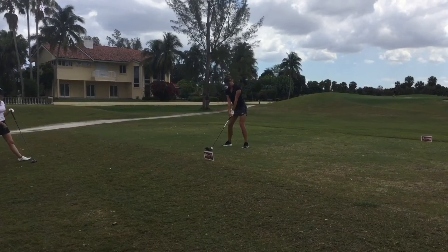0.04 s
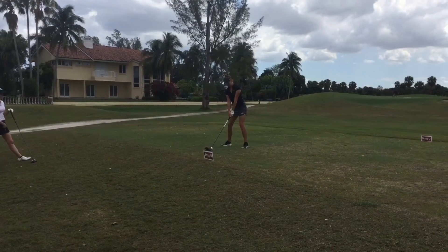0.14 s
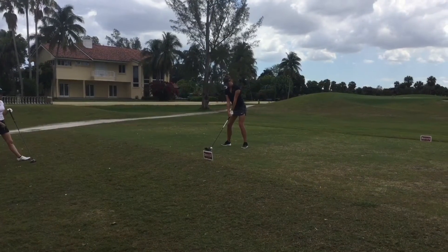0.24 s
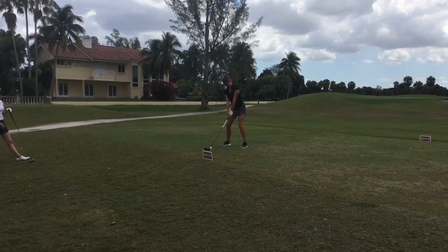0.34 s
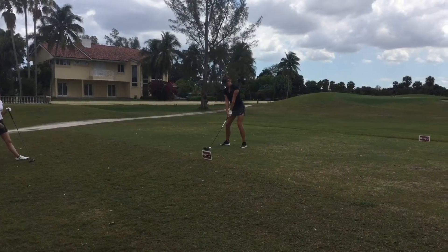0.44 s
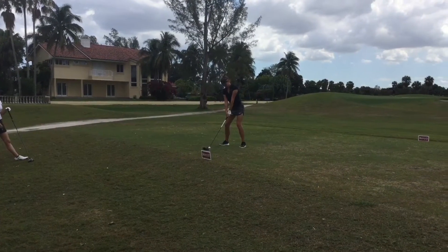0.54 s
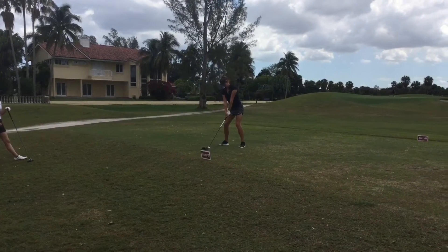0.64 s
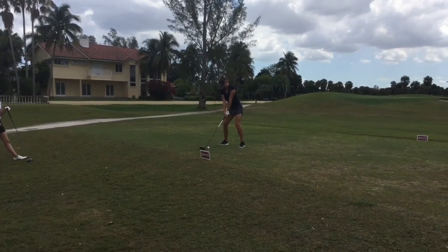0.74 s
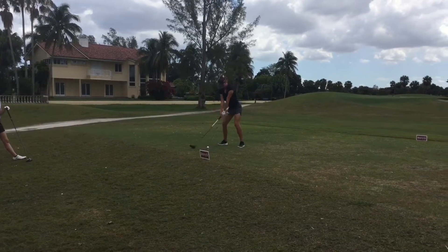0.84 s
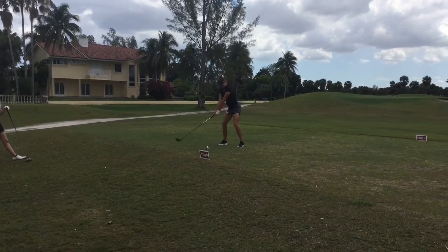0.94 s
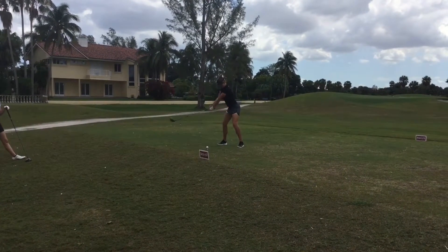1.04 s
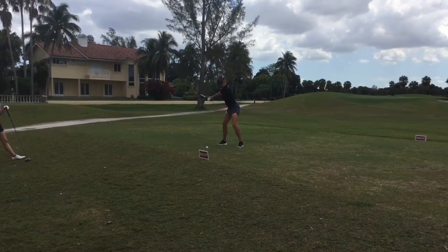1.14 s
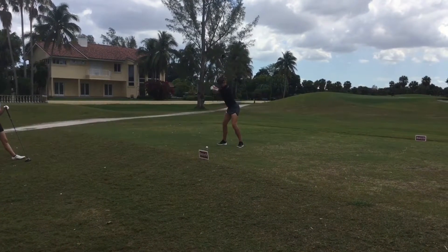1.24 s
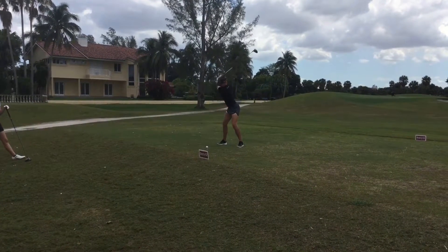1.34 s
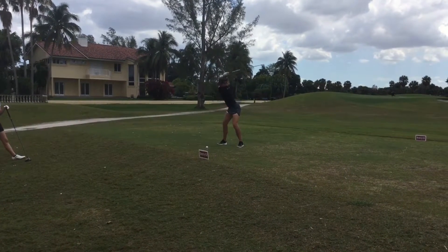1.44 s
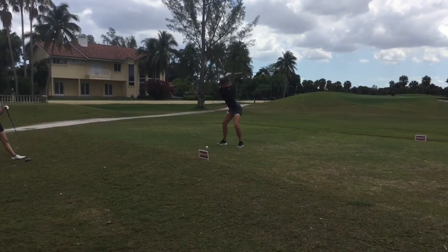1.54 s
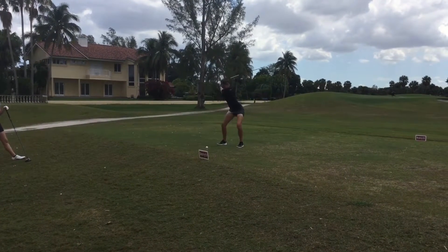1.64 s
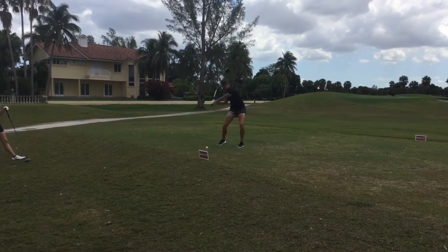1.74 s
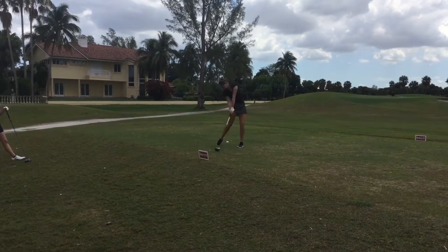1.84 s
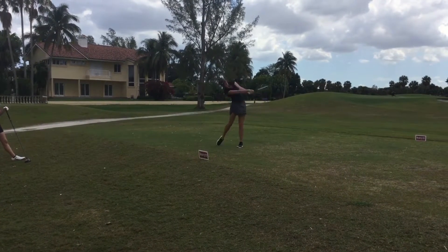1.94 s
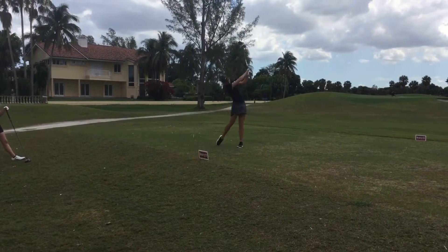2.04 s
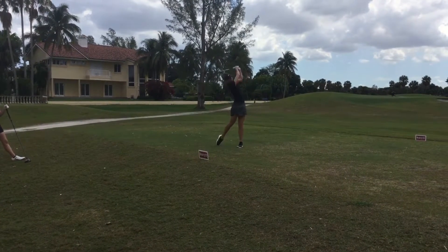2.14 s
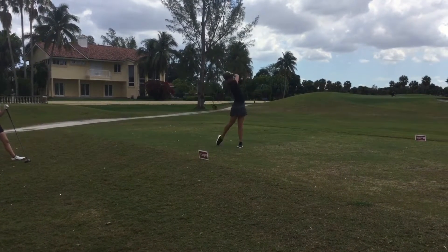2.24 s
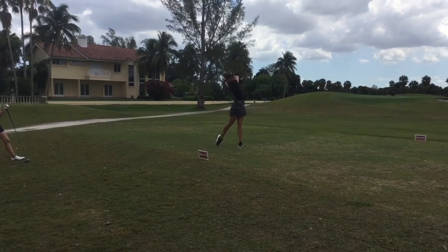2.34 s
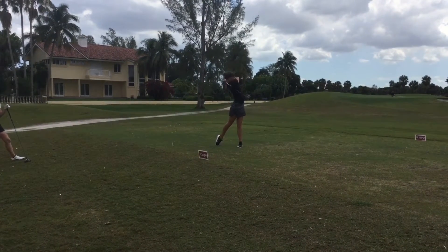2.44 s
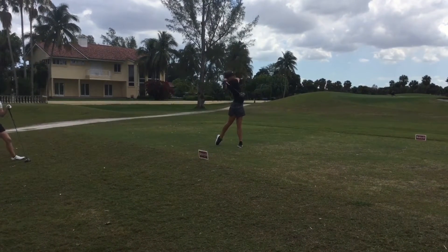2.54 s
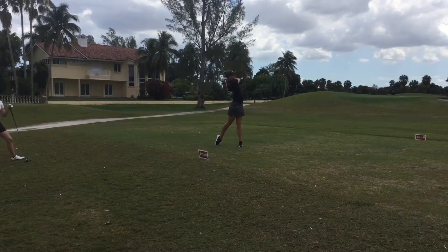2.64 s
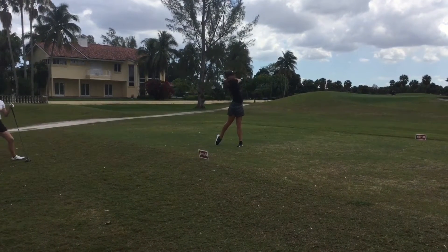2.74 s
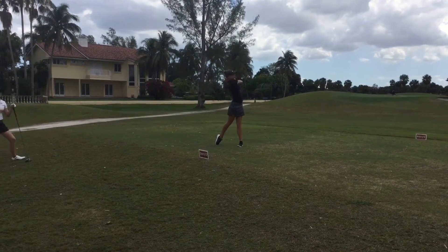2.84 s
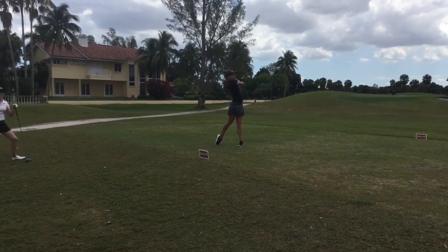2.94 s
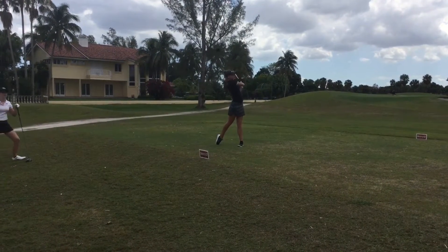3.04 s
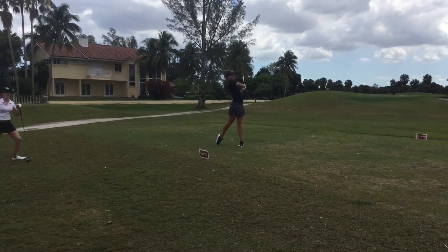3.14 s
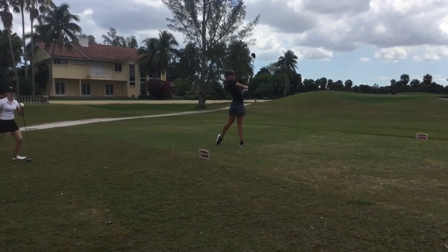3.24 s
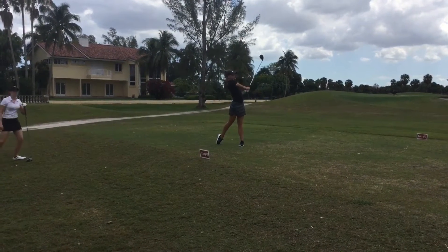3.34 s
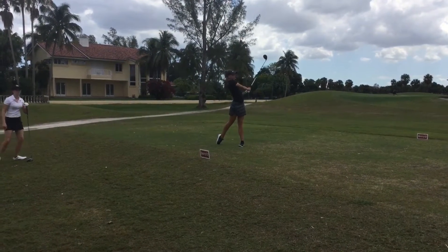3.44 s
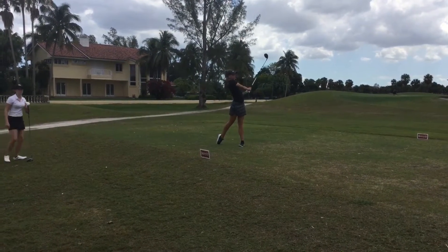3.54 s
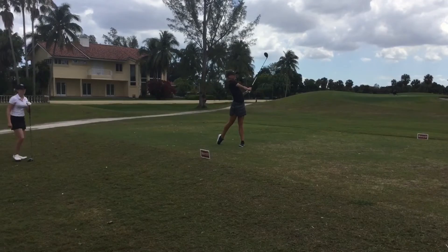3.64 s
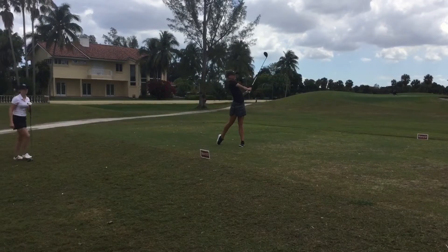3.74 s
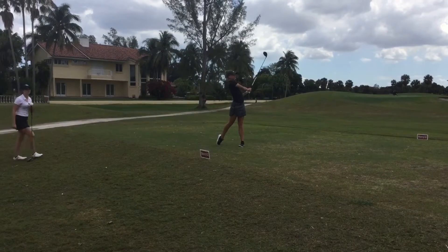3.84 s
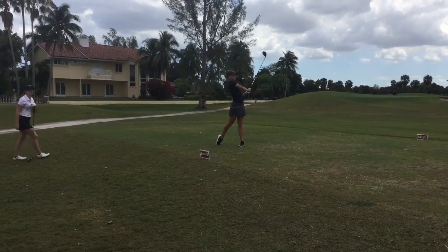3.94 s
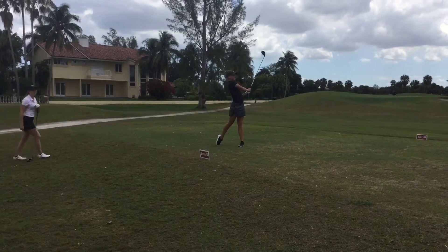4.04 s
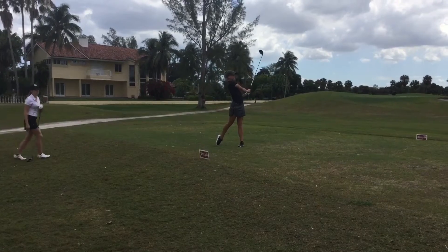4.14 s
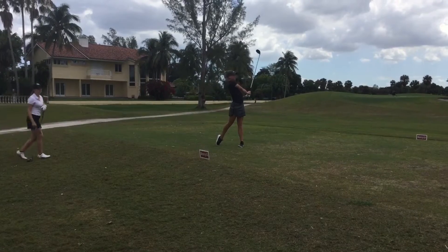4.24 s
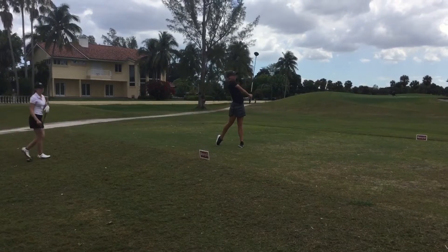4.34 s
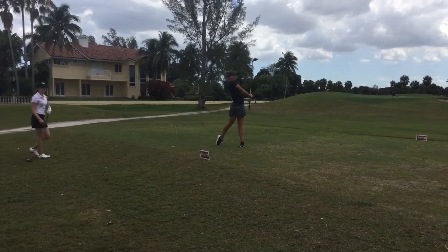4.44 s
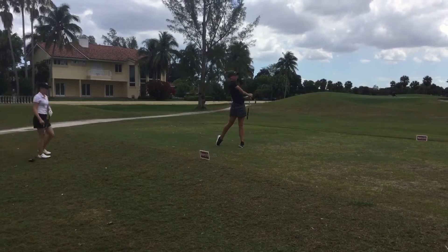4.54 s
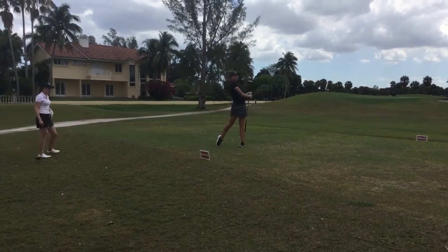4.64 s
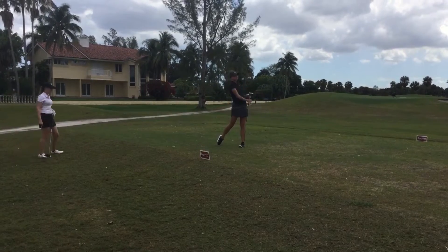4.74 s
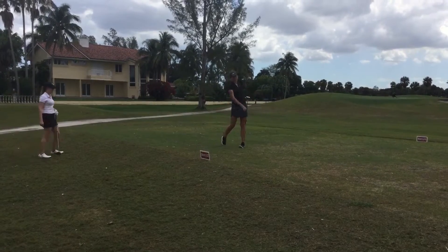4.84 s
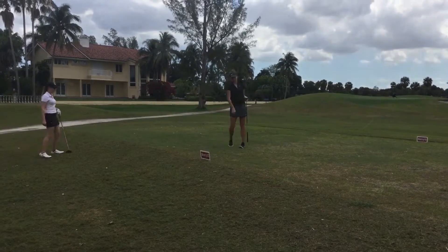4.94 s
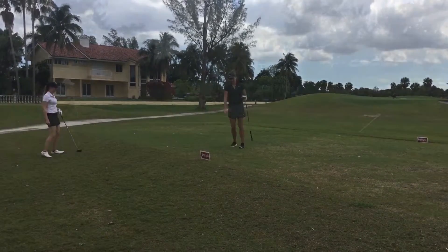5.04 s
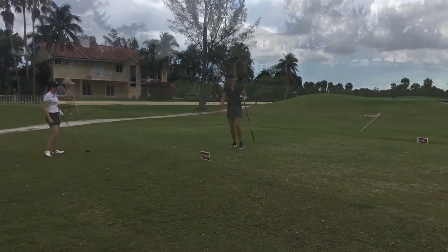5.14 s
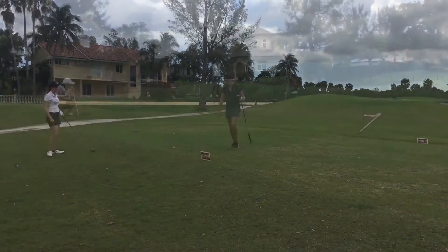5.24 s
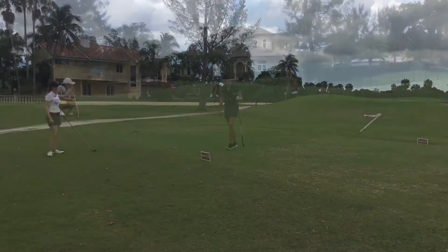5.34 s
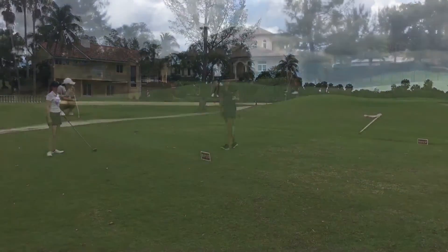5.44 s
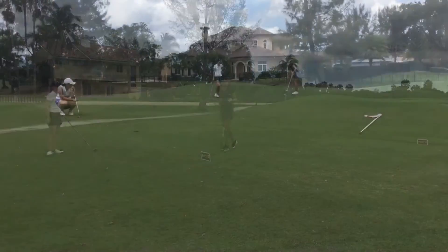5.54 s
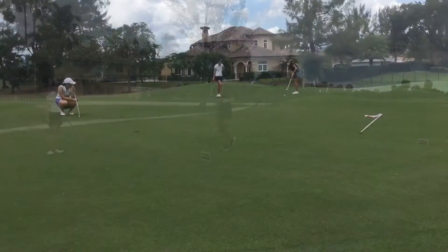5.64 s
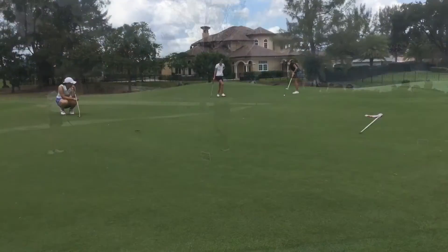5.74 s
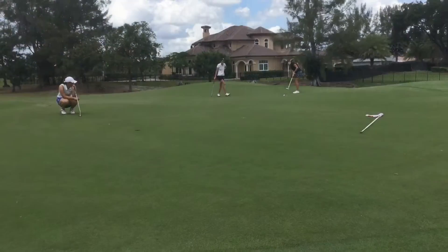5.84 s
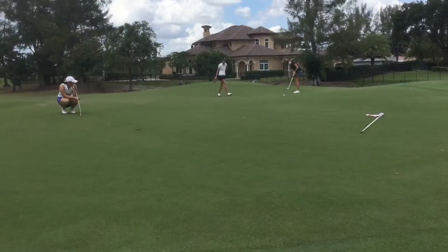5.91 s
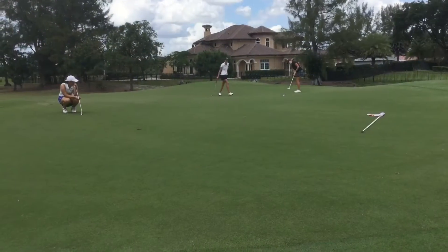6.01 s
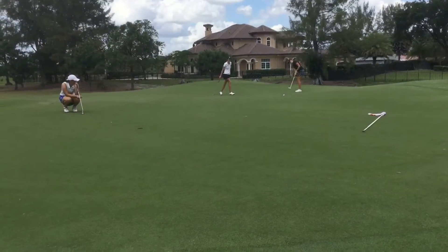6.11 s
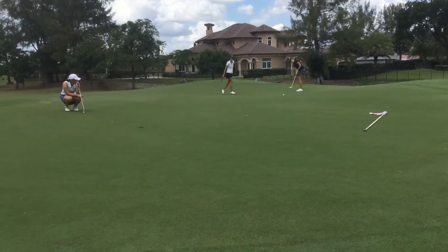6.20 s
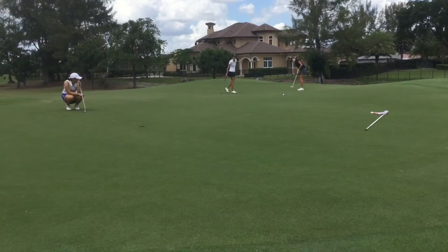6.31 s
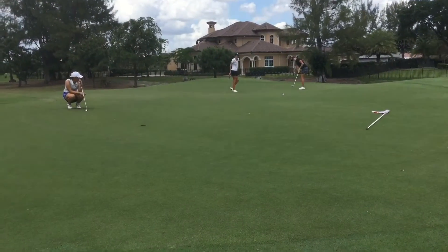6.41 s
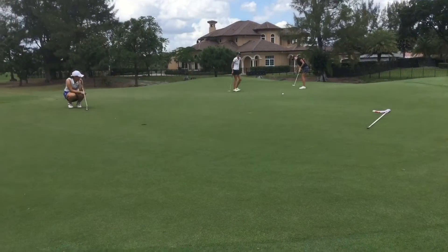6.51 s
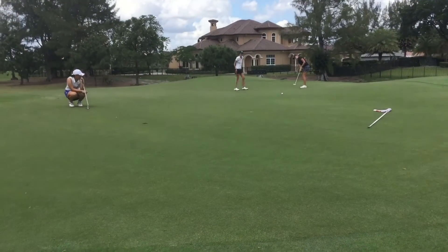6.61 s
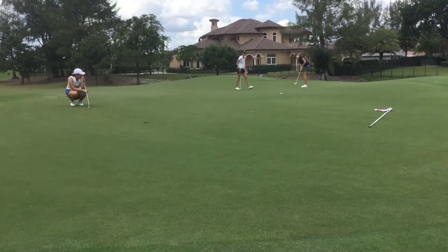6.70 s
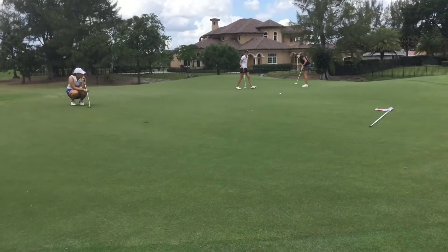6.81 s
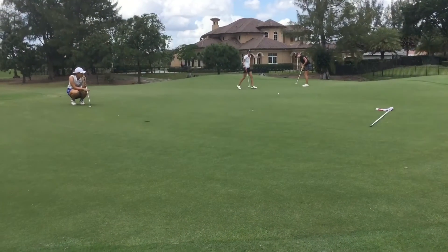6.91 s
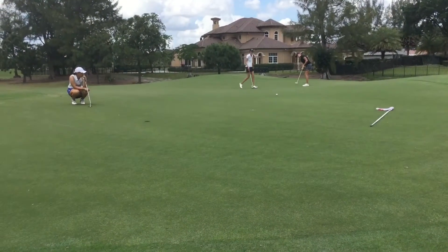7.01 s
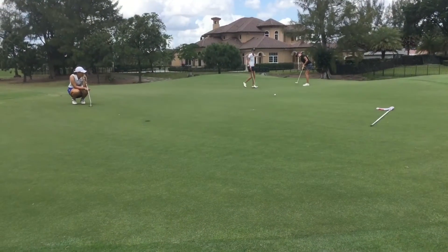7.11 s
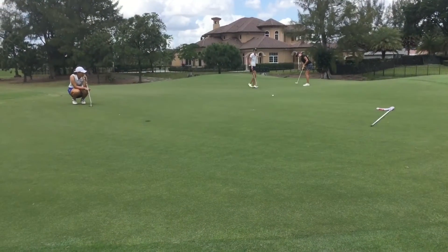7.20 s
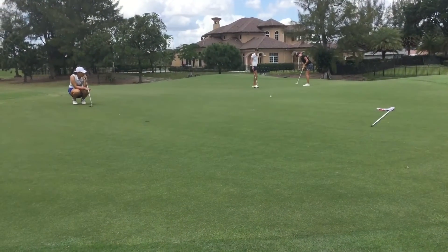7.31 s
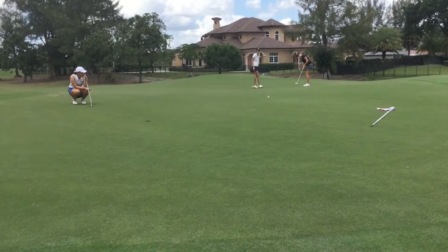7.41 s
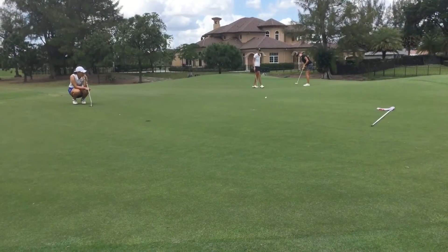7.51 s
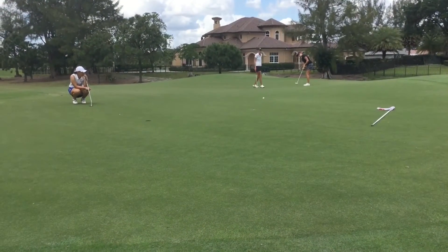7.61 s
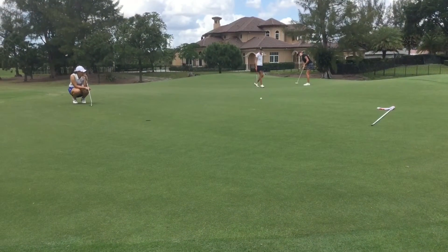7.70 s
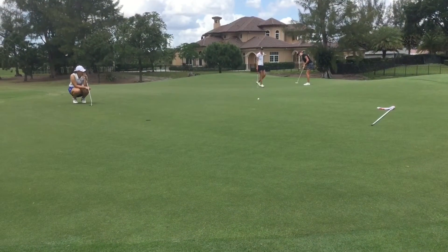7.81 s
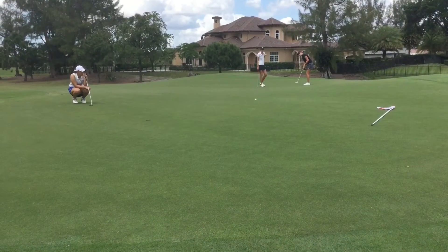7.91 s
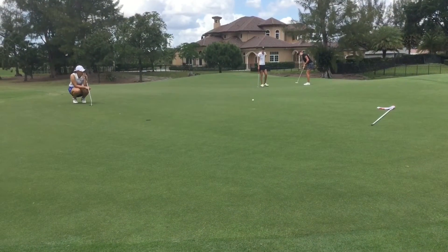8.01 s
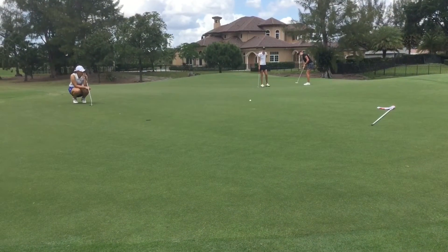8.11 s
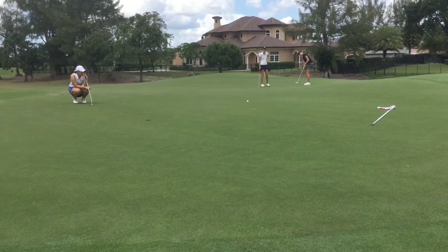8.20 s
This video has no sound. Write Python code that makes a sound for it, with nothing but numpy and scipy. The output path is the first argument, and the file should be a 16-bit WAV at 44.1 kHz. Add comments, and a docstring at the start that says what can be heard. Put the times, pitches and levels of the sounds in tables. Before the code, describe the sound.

One hard golf drive dominates: a sharp pop with a bright crack and short metal ring, preceded by a faint rush of the swing and followed by patchy echoes dying within about a second. Around it lies quiet outdoor air with uneven deep rumble, soft foliage hush, tiny clicks and faint bird chirps. Later the hush gently changes to a fuller one at a green, with small ticks and distant whistles, heard by one outdoor microphone.

```python
"""Open golf course: a driver cracks a ball off the tee, and house and trees send the crack back in waves.
The blow is a falling pop, a burst of noise and a metal ring; trees return blurred noise, walls short slaps.
Under it lie a low rumble, a faint hum and the hush of air in the trees, all shaped noise.
Far birds are gliding tones; small ticks of gear and feet are puffs of noise, a glove slide is many tiny slips.
Around five seconds the hush of the tee fades out under the fuller hush of a green."""
import sys
import numpy as np
from scipy import signal
from scipy.fft import rfft, irfft
from scipy.io import wavfile

SR = 44100
rng = np.random.default_rng(int(sys.argv[2]) if len(sys.argv) > 2 else 0)


def amplitude_ratio(level_db):
    """Convert a level in decibels to the matching linear amplitude (field) ratio."""
    exponent = np.asarray(level_db, float) / 20
    return 10 ** exponent


def generate_wav(signal):
    """Clip the signal to [-1, 1] and save it as 16-bit WAV at the path in sys.argv[1]."""
    frames = np.transpose(np.atleast_2d(signal))
    scaled = np.clip(frames, -1, 1) * 32767
    pcm = np.round(scaled).astype(np.int16)
    wavfile.write(sys.argv[1], SR, pcm)


N = 364266   # samples
T = np.arange(N) / SR   # s

# Spectra named *_COLOUR hold relative levels; each is scaled to rms 1 before its own gain.
# rumble loudness: [t/s, deep level/dB, upper level/dB]
RUMBLE_LEVEL = [(0.0, -57.5, -47), (0.7, -47, -50), (1.7, -44.5, -51), (1.91, -41, -54), (2.0, -57, -50.5),
                (2.11, -50.5, -48.5), (2.8, -50.5, -53), (3.15, -44.5, -49), (3.68, -46, -49.5),
                (3.82, -50.5, -50.5), (4.28, -43.5, -48), (5.36, -53.5, -52), (6.1, -40.5, -50),
                (6.69, -45, -51), (7.36, -47, -47), (7.59, -55, -52), (7.84, -48.5, -48), (8.26, -46, -47)]
# rumble spectrum: [f/Hz, level/dB]
RUMBLE_COLOUR = [(20, -45), (31, -22.5), (39, -14), (50, -9), (61, 0.38), (68, 0.5), (77, 4), (90, -2.5),
                 (105, -0.5), (125, -3), (145, -4.5), (165, -9), (210, -17.5), (270, -25.5), (330, -31),
                 (430, -56)]
# air in the trees at the tee: [f/Hz, level/dB]
TEE_HUSH_COLOUR = [(120, -32), (200, -1.5), (240, -7), (424, -20.5), (491, -22.5), (590, -15.5), (659, -20),
                   (916, -23), (1040, -20.5), (2560, -35.5), (3190, -39), (14300, -51.5), (16000, -57.5)]
# air in the trees at the green: [f/Hz, level/dB]
GREEN_HUSH_COLOUR = [(120, -34.5), (200, -4), (259, -6), (373, -10.5), (401, -14.5), (432, -11), (465, -16),
                     (763, -19), (933, -21.5), (2910, -37.5), (5630, -47.5), (13800, -56), (16000, -68)]
# fade-out of the tee hush: [start t/s, end t/s]
TEE_FADE = (4.82, 5.83)
# hush at the green: [t/s, level/dB]
GREEN_LEVEL = [(4.9, -73), (5.4, -65), (5.75, -59), (6.12, -57.5), (6.6, -58), (7.3, -57.5), (8.26, -56)]
# edges of the bands in which the hush comes in patches: [f/Hz]
PATCH_EDGES = [200, 330, 520, 800, 1150, 1600, 2400]
# faint far hum: [t/s, level/dB]
HUM_LEVEL = [(0, -76), (.33, -66.5), (.55, -78.5), (2.3, -80.5), (5.3, -88)]
# small ticks of gear and feet: [t/s, starting level/dB, low f/Hz, high f/Hz, t60/s]
TICKS = [(.735, -70.5, 2000, 7000, 0.11), (1.265, -64, 1300, 2300, 0.033), (2.855, -65, 1200, 1980, 0.042),
         (2.927, -61.5, 900, 2300, 0.14), (3.209, -53, 950, 2200, 0.047),
         (3.52, -77.5, 12000, 15100, 0.079), (4.047, -56, 1000, 2440, 0.021),
         (4.797, -57.5, 1200, 15000, 0.055), (5.337, -69, 3500, 6500, .02),
         (5.405, -46.5, 500, 1900, 0.014), (6.949, -58.5, 1350, 2190, 0.048),
         (7.417, -59.5, 1395, 2300, .04)]
# bird whistles: [t/s, length/s, start f/Hz, end f/Hz, peak level/dB before flutter]
WHISTLES = [(1.17, 0.11, 3440, 3250, -82), (1.31, .095, 3150, 3150, -80), (1.395, .02, 2670, 2450, -76),
            (5.774, .025, 3870, 3500, -79), (5.82, .03, 4000, 3600, -78.5), (5.86, .03, 4050, 4000, -80.5),
            (5.95, .025, 3880, 3580, -81), (5.978, 0.037, 4200, 3700, -80),
            (7.16, 0.035, 3040, 3160, -74.5), (7.222, 0.035, 3050, 2800, -69.5),
            (7.962, .045, 3050, 2670, -71)]
# harsh chirp of a nearer bird: [t/s, f/Hz, level/dB, octave re fundamental/dB, third harmonic re fundamental/dB]
CHIRP = [(1.479, 2870, -75, -24.5, -22), (1.487, 2845, -62, -30, -18), (1.494, 2600, -68, -22, -11),
         (1.498, 2390, -61, -9, -26), (1.506, 2230, -61, -6, -34), (1.526, 2150, -71, -8, -34)]
# turbulence of the downswing: [f/Hz, level/dB]
SWISH_COLOUR = [(150, -41), (250, -8.5), (748, -2.5), (1070, -16.5), (2160, -20.5), (3210, -32),
                (4370, -26), (15000, -37.5)]
# ball squashed on the face: [start f/Hz, end f/Hz, 1/e fall of pitch/s, level/dB before a 3 dB lift, t60/s]
POP = (2300, 300, .0008, -2.0, .0105)
# crack of the face: [f/Hz, level/dB]
CRACK_COLOUR = [(1800, -20), (3000, -12), (4100, -0.5), (5200, -6), (7000, -2), (8000, -7), (9500, -2.5),
                (12500, -5), (15500, -9)]
# modes of the hollow metal head: [f/Hz, level/dB, t60/s]
HEAD_MODES = [(3250, -41, .07), (4186, -28, .04), (4257, -27, 0.045), (4430, -32, 0.1), (5007, -37, 0.013),
              (5980, -31.5, 0.043), (6440, -25, .06), (6577, -28.5, .07), (6930, -26.5, .04),
              (6500, -30.5, .05), (7165, -30.5, .04), (8224, -27.5, .025), (8952, -39, 0.09),
              (11000, -36, 0.08), (13700, -35.5, 0.12)]
# scatter from turf and bushes close by: [f/Hz, level/dB]
NEAR_COLOUR = [(150, -32.5), (250, -2.5), (583, -3), (795, -11), (1590, -4.5), (2620, -17), (3160, -10),
               (4320, -3), (4790, -17.5), (6420, -7), (7380, -13.5), (11400, -9), (15500, -16)]
# flat faces: [t/s, tone level/dB before air loss, strongest f/Hz, breadth 0-1 (noise beside the tone), t60/s]
SLAPS = [(1.9405, -21.5, 6417, 0.2, .035), (1.949, -41, 4350, 0.1, .11), (1.962, -47, 3150, .1, .1),
         (2.0562, -55.5, 4230, .3, .04), (2.077, -48.5, 4300, .9, 0.024), (2.1001, -43, 4280, 0.5, .02),
         (2.2518, -57, 6150, 0.76, .08), (2.3905, -48, 4000, 0.68, 0.019)]
# stands of trees: [t/s, level/dB before air loss, rise/s, t60/s]
TREES = [(1.99, -60.5, .02, 0.64), (2.054, -58, 0.0043, 0.35), (2.075, -51.5, .006, .3),
         (2.09, -51.5, 0.03, .6), (2.25, -60.5, 0.022, 1.0), (2.40, -69.5, .03, .9)]
# far returns: [f/Hz, level/dB]
FAR_COLOUR = [(240, -34), (400, -5), (511, -11.5), (586, -7.5), (738, -9), (1100, -5.5), (1790, -9.5),
              (2970, -10.5), (3210, -15), (4220, -4), (4840, -15.5), (6280, -4.5), (6890, -11.5),
              (13500, -18), (15500, -27)]
# shaft rubbing in the glove: [f/Hz, level/dB]
SLIDE_COLOUR = [(710, -33), (1200, -8), (1570, -14), (1980, 4), (2310, -11.5), (2770, -5.5), (3210, -12.5),
                (6310, -17), (14500, -16), (15500, -17)]
# modes of the grounded club: [f/Hz, level/dB, t60/s]
KNOCK_MODES = [(1030, -55, 0.056), (2150, -64, .04), (6000, -68, .08), (6500, -70, .06)]

STRIKE_S = 1.9350   # moment of impact


def rms_one(x):
    """Scale to rms 1."""
    return x / np.sqrt(np.mean(x ** 2) + 1e-20)


def in_time(rows):
    """Columns of a timed curve, read at every sample."""
    s, *columns = np.transpose(rows)
    return [np.interp(T, s, c) for c in columns]


def level(rows):
    """Gain from a time and dB curve, silent outside it."""
    return amplitude_ratio(in_time(rows)[0]) * (T > rows[0][0]) * (T < rows[-1][0])


def coloured(x, points):
    """Shape a signal by a spectrum, straight lines over log pitch; rms 1."""
    hz = np.maximum(np.fft.rfftfreq(len(x), 1 / SR), 1)
    f, db = np.transpose(points)
    gain = amplitude_ratio(np.interp(np.log(hz), np.log(f), db, -99, -99))
    return rms_one(irfft(rfft(x) * gain, len(x)))


def drift(rate_hz):
    """Random wander of rms about 1: noise through two equal low-pass poles at rate_hz."""
    every = 40   # samples between drawn values
    r = np.exp(-2 * np.pi * every * rate_hz / SR)
    slow = signal.lfilter([1], [1, -2 * r, r * r], rng.standard_normal(N // every + 2002))
    slow = slow[2000:]   # let the filter settle
    return np.interp(np.arange(N) / every, np.arange(len(slow)), rms_one(slow))


def dying(t, t60):
    """Exponential decay, 60 dB in t60 seconds."""
    return amplitude_ratio(-60 * t / t60)


def modes(t, rows):
    """Sum of dying sines, one for each mode of a struck body."""
    return sum(amplitude_ratio(db) * np.sin(2 * np.pi * hz * t) * dying(t, t60) for hz, db, t60 in rows)


def high(x, hz):
    """Second-order high-pass."""
    return signal.sosfilt(signal.butter(2, hz, "high", fs=SR, output="sos"), x)


def band(x, low_hz, high_hz):
    """Steep band-pass."""
    sos = signal.butter(3, [low_hz, min(high_hz, .45 * SR)], "band", fs=SR, output="sos")
    return signal.sosfilt(sos, x)


def place(out_s, x):
    """A short sound put at its moment."""
    out, i = np.zeros(N), round(out_s * SR)
    out[i:i + len(x)] = x[:N - i]
    return out


def rumble():
    """Lumpy low noise, split at 105 Hz into two parts that swell separately."""
    deep_db, upper_db = in_time(RUMBLE_LEVEL)
    whole = coloured(rng.standard_normal(N), RUMBLE_COLOUR)
    upper = signal.sosfiltfilt(signal.butter(2, 105, "high", fs=SR, output="sos"), whole)
    deep = rms_one(whole - upper) * amplitude_ratio(deep_db + 1.5 * drift(4.0))
    return deep + rms_one(upper) * amplitude_ratio(upper_db + 1.3 * drift(4.0))


def hush():
    """Air in the trees: broad noise that comes in patches and changes colour with the place."""
    tee_db, patch_db = -63, 1.3
    tee_fade = np.sqrt(np.interp(T, TEE_FADE, [1, 0]))
    out = tee_fade * amplitude_ratio(tee_db) * coloured(rng.standard_normal(N), TEE_HUSH_COLOUR)
    out += level(GREEN_LEVEL) * coloured(rng.standard_normal(N), GREEN_HUSH_COLOUR)
    for edges in zip(PATCH_EDGES, PATCH_EDGES[1:]):
        part = signal.sosfiltfilt(signal.butter(2, edges, "band", fs=SR, output="sos"), out)
        out = out + part * (amplitude_ratio(patch_db * drift(5.9)) - 1)
    return out * amplitude_ratio(.8 * drift(6.0))


def hum():
    """A faint far hum that wavers: noise through one narrow resonance."""
    hz, width_hz = 593.4, 8.4
    r = np.exp(-np.pi * width_hz / SR)
    poles = [1, -2 * r * np.cos(2 * np.pi * hz / SR), r * r]
    return rms_one(signal.lfilter([1, 0, -1], poles, rng.standard_normal(N))) * level(HUM_LEVEL)


def ticks():
    """Each tick of gear or feet is a dying puff of noise in its own band."""
    tilt_hz, edge_db = 500, -26   # duller above the tilt, with a bright edge kept
    out, t = np.zeros(N), np.arange(SR // 6) / SR
    dull = np.exp(-2 * np.pi * tilt_hz / SR)
    for s, db, low_hz, high_hz, t60 in TICKS:
        noise = rng.standard_normal(len(t))
        puff = signal.lfilter([1 - dull], [1, -dull], noise) + amplitude_ratio(edge_db) * noise
        puff = rms_one(band(puff, low_hz, high_hz))
        out += place(s, amplitude_ratio(db) * puff * dying(t, t60) * np.minimum(t / 0.0012, 1))
    return out


def whistles():
    """Short bird notes: sines gliding evenly in pitch under a half-sine swell."""
    out = np.zeros(N)
    for s, length, start_hz, end_hz, db in WHISTLES:
        t = np.arange(int(length * SR)) / SR
        phase = 2 * np.pi * (start_hz * t + (end_hz - start_hz) * t ** 2 / (2 * length))
        out += place(s, amplitude_ratio(db) * np.sin(np.pi * t / length) * np.sin(phase))
    return out


def chirp():
    """A nearer bird's harsh chirp: a falling tone with two overtones and a rough pitch."""
    hz, db, octave_db, third_db = in_time(CHIRP)
    phase = 2 * np.pi * np.cumsum(hz * (1 + .045 * drift(220.0))) / SR
    voice = np.sin(phase) + amplitude_ratio(octave_db) * np.sin(2 * phase) + amplitude_ratio(third_db) * np.sin(3 * phase)
    return level([(row[0], row[2]) for row in CHIRP]) * voice


def birds():
    """Whistles and chirp, fluttering, each followed by a dying blur of echo."""
    out = (whistles() + chirp()) * amplitude_ratio(3.0 * drift(90.0))   # flutter of air and throat
    t = np.arange(SR // 4) / SR
    blur = rng.standard_normal(len(t)) * dying(t, 0.23)
    return out + amplitude_ratio(-33) * signal.fftconvolve(out, blur)[:N]


def swing():
    """Turbulence swells as the head comes down, fast at first, levelling off near the ball."""
    length_s, impact_db, swell_db = .095, -48, 33   # the swell is the rise over the last length_s
    ahead = (STRIKE_S - T) / length_s
    gain = amplitude_ratio(impact_db - swell_db * np.clip(ahead, 0, 3) ** 1.6) * (ahead > 0)
    return coloured(rng.standard_normal(N), SWISH_COLOUR) * gain


def ball_pop(t):
    """The ball squashed on the face: a short sine dropping quickly in pitch."""
    start_hz, end_hz, fall, db, t60 = POP
    turns = end_hz * t + (start_hz - end_hz) * fall * (1 - np.exp(-t / fall))
    pop = amplitude_ratio(db + 3) * np.sin(2 * np.pi * turns - 1.07) * dying(t, t60) * np.minimum(t / .0005, 1)
    return np.roll(pop, round(.0003 * SR))   # 0.3 ms late; the tail that wraps round has died away


def face_crack(t):
    """Crack of the face: a dying burst of bright noise."""
    return amplitude_ratio(-10.5) * coloured(rng.standard_normal(len(t)), CRACK_COLOUR) * dying(t, .008)


def near_scatter(ring):
    """Turf and bushes close by return a lumpy blur of noise and a smear of the ring."""
    noise_db, ring_db = -31, -39.5   # before fading; gain of the smear
    t60, end_s = 0.35, 0.056   # the end is a bell-shaped cut, 1/e at end_s
    t = np.arange(SR // 3) / SR
    fading = dying(t, t60) * np.exp(-(t / end_s) ** 2) * np.minimum(t / .003, 1)
    lumps = amplitude_ratio(2.5 * drift(90.0)[:len(t)])   # separate bushes, separate returns
    smear = signal.fftconvolve(ring, rng.standard_normal(len(t)) * fading)
    blur = coloured(rng.standard_normal(len(t)), NEAR_COLOUR) * fading * lumps
    return place(STRIKE_S, amplitude_ratio(ring_db) * smear) + place(STRIKE_S, amplitude_ratio(noise_db) * blur)


def strike():
    """Pop, crack and ring of the head together, their bounce off the turf and the scatter close by."""
    bounce_s, pop_db, crack_db, ring_db = .0056, -21.98, -13.85, -1.585   # bounce delay and gains
    t = np.arange(SR // 5) / SR
    pop, crack, ring = ball_pop(t), face_crack(t), modes(t, HEAD_MODES)
    bounce = amplitude_ratio(pop_db) * pop + amplitude_ratio(crack_db) * crack + amplitude_ratio(ring_db) * ring
    return place(STRIKE_S, pop + crack + ring) + place(STRIKE_S + bounce_s, bounce) + near_scatter(ring)


def tree_blur():
    """Foliage returns noise; the stands of trees rise and die separately and add in power."""
    power = np.zeros(N)
    for s, db, rise, t60 in TREES:
        t = np.maximum(T - s, 0)
        power += (amplitude_ratio(db) * np.minimum(t / rise, 1) * dying(t, t60)) ** 2
    return coloured(rng.standard_normal(N), FAR_COLOUR) * amplitude_ratio(1.46 * drift(66.0)) * np.sqrt(power)


def wall_slaps():
    """Flat faces return short slaps: a dying tone with some noise around it."""
    out, t = np.zeros(N), np.arange(SR // 10) / SR
    for s, db, hz, breadth, t60 in SLAPS:
        noise = coloured(rng.standard_normal(len(t)), FAR_COLOUR)
        slap = np.sin(2 * np.pi * hz * t) + np.clip(breadth, 0, 1) * noise
        out += place(s, amplitude_ratio(db) * slap * dying(t, t60))
    return out


def echoes():
    """Tree blur and wall slaps through air that dulls them: the longer the path, the less treble."""
    loss_db = -36.5   # at 10 kHz per s of path, rising with the square of pitch
    spectrum, hz, out = rfft(tree_blur() + wall_slaps()), np.fft.rfftfreq(N, 1 / SR), 0
    path_s = np.clip(T - STRIKE_S - .1, 0, 1)   # counted from 0.1 s after impact
    for centre in np.arange(0, 17000, 2000):
        overlap = np.clip(1 - abs(hz - centre) / 2000, 0, 1)
        part = irfft(spectrum * overlap, N) * amplitude_ratio(2.0 * drift(25.0))   # each pitch range flutters alone
        out = out + part * amplitude_ratio(loss_db * path_s * (centre / 10000) ** 2)
    # farther trees return less of the middle
    return out - band(out, 1500, 3700) * np.interp(T, [2.15, 2.25], [0, .6])


def slide():
    """Shaft through the glove: stick-slip friction in uneven clumps, brighter as the shaft speeds up."""
    start_s, length_s, start_db, swell_db = 4.298, .128, -64.5, 3.5
    grip_db_per_s, release_db_per_s = 1100, 800   # how fast it starts and stops
    slips = rng.random(N) < 5000 * amplitude_ratio(3.0 * drift(70.0)) / SR   # about 5000 slips per s
    sizes = rng.standard_normal(N) * amplitude_ratio(2.3 * np.minimum(rng.exponential(1, N), 4))
    rub = coloured(slips * sizes, SLIDE_COLOUR)
    t = T - start_s
    speed = np.clip(t / length_s, 0, 1)
    rub += high(rub, 5600) * .6 * (speed - .5)
    edges_db = grip_db_per_s * np.minimum(t, 0) - release_db_per_s * np.maximum(t - length_s, 0)
    return rub * amplitude_ratio(1.6 * drift(110.0) + start_db + swell_db * speed + np.maximum(edges_db, -200))


def knock():
    """The club is grounded and a few of its modes ring briefly."""
    t = np.arange(SR // 6) / SR
    return place(4.797, modes(t, KNOCK_MODES) * np.minimum(t / .002, 1))


def scene():
    """All sources, one microphone."""
    air = rumble() + hush() + hum()
    return (air + ticks() + birds() + swing() + strike() + echoes() + slide() + knock())[None]


def roll_off(x):
    """The treble ends steeply here."""
    return signal.sosfilt(signal.butter(12, 16480, fs=SR, output="sos"), x)


def record(dry):
    """The top of the treble is cut; a 4 ms fade closes the end without a click."""
    cut = signal.sosfilt(signal.cheby2(10, 45, 16500, fs=SR, output="sos"), dry)
    finished = cut * np.minimum((T[-1] - T) / .004, 1)
    return roll_off(finished)


dry = scene()
out = record(dry)
generate_wav(out)
```